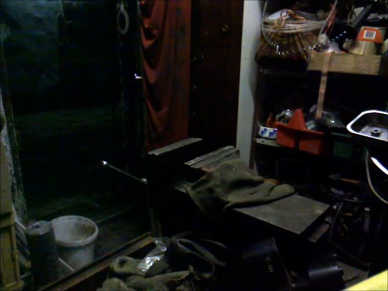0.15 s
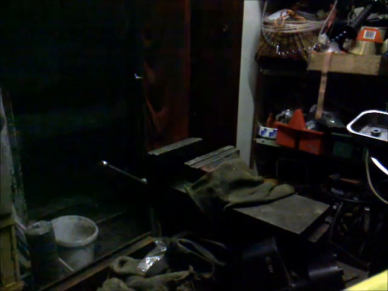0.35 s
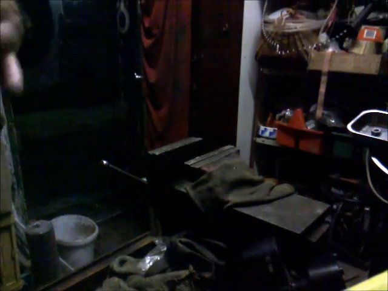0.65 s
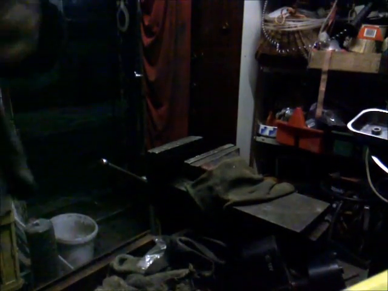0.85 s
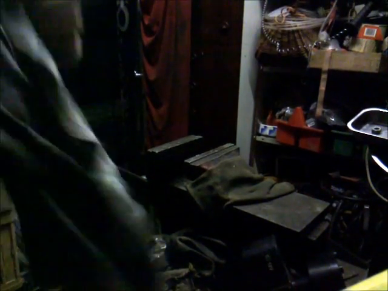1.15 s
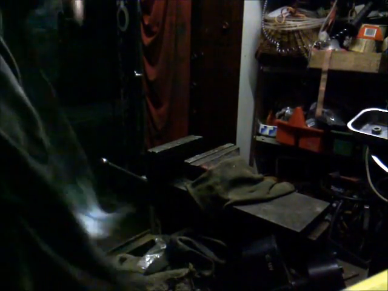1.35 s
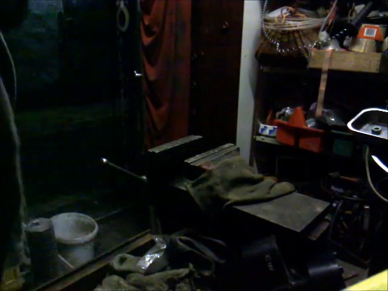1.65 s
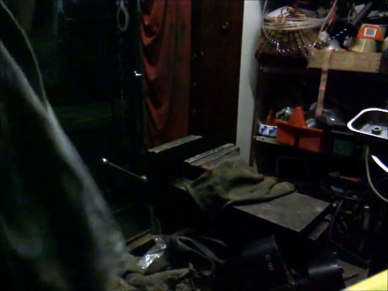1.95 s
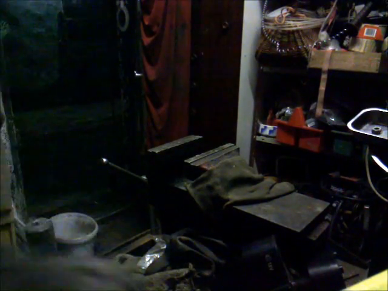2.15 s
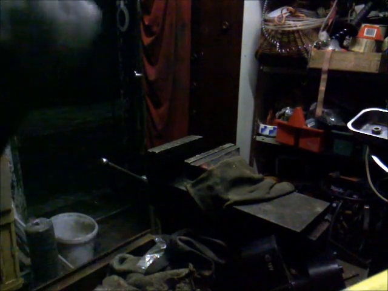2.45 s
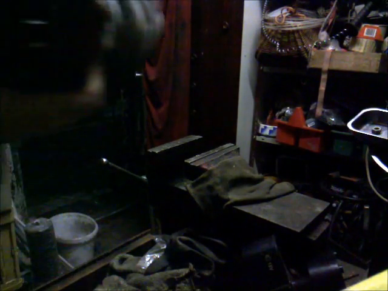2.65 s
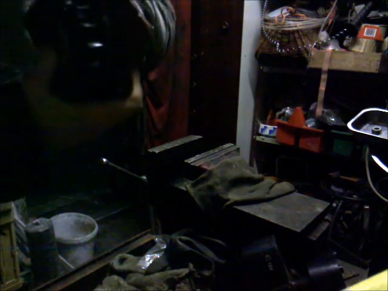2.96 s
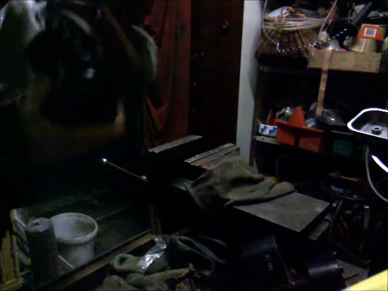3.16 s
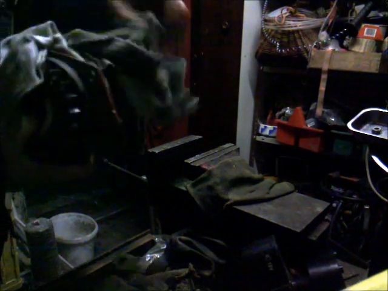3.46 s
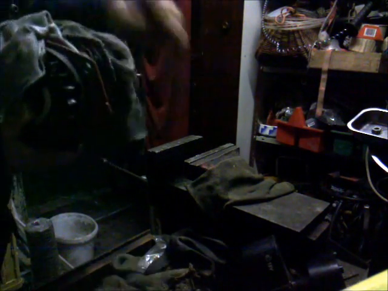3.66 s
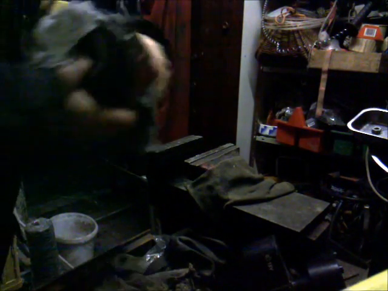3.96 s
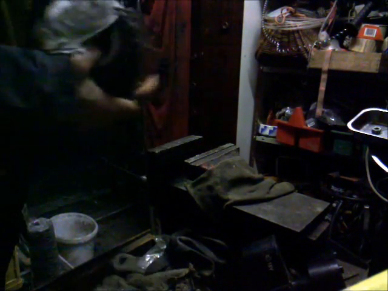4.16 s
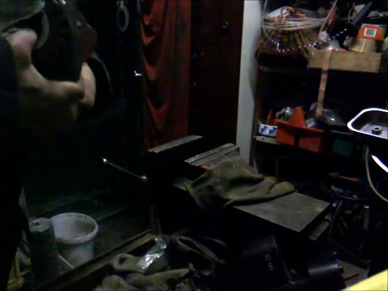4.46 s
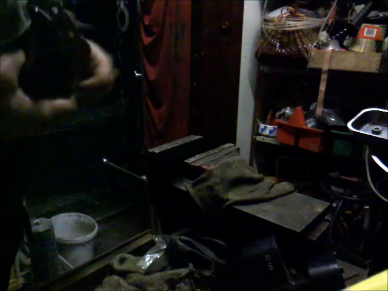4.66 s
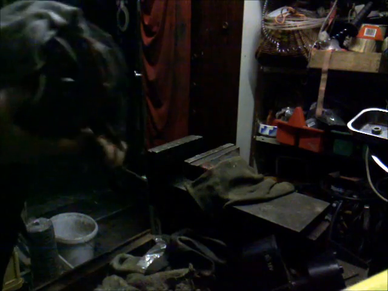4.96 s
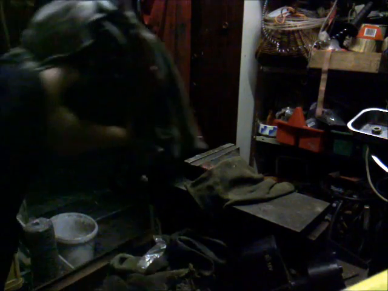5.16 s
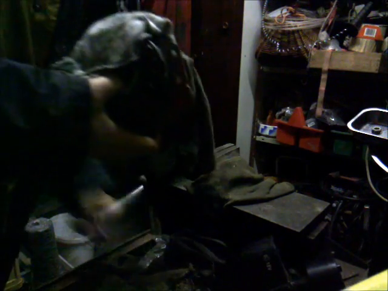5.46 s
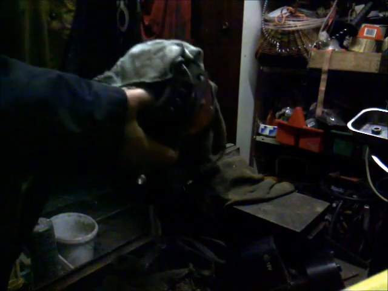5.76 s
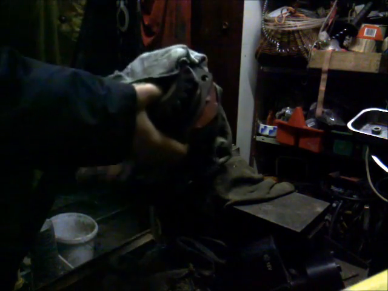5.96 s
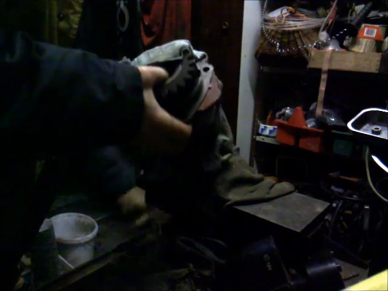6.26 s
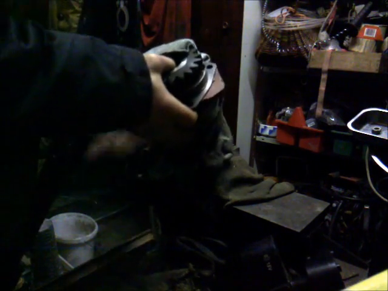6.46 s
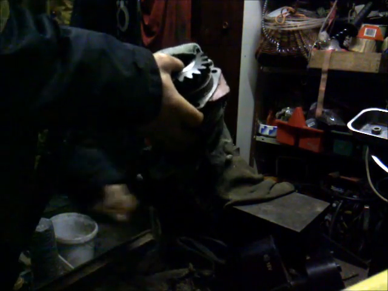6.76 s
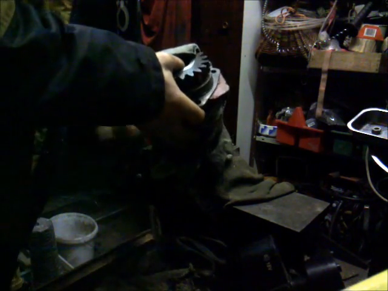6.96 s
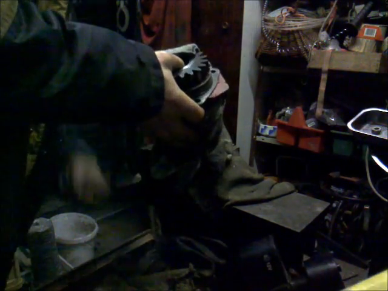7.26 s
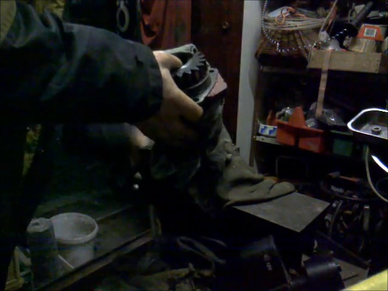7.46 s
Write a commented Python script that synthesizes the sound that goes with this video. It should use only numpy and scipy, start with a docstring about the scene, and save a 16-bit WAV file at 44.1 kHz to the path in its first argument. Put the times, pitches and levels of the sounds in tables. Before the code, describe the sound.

A hard clunk and short skid, then soft cloth rustling, then a rag wiped in rough strokes over a heavy metal gear with dull knocks.

```python
"""A rag is wiped hard over a heavy metal gear in strokes, with dull knocks, in a small workshop.
The wiping is uneven jolts and gritty noise through resonances; each knock rings damped modes under a crack.
Early on a part is knocked down and skids. Sleeves and rag rustle as clumpy noise, over quiet air and hiss.
The sound is widened into two channels with short opposed delays."""
import sys
import numpy as np
from scipy import signal
from scipy.fft import rfft, irfft, next_fast_len
from scipy.io import wavfile
from scipy.ndimage import uniform_filter1d, map_coordinates

SR = 44100
rng = np.random.default_rng(int(sys.argv[2]) if len(sys.argv) > 2 else 0)


def transcribe(u):
    """Save the signal u as a 16-bit wav file named by the first command-line argument.

    u: samples, shape (n,) or (channels, n), limited to [-1, 1]; the rate is SR.
    q: integer samples, one column per channel.
    """
    v = np.clip(np.atleast_2d(u).T, -1, 1)
    q = np.round(v * 32767).astype(np.int16)
    wavfile.write(sys.argv[1], SR, q)


N = 335601


def amp(db):
    """Turn a level in dB into a gain."""
    return 10 ** (np.asarray(db) / 20)


def unit(x):
    """Scale x to an average strength (rms) of 1."""
    return x / np.sqrt(np.mean(x ** 2) + 1e-20)


def along(points, hz):
    """Read a curve of (Hz, value) points at the given frequencies, on a log axis."""
    point_hz, value = np.transpose(points)
    return np.interp(np.log(hz + 1), np.log(point_hz + 1), value)


def curve(points):
    """Join (seconds, value) points into one value per sample."""
    point_s, value = np.transpose(points)
    return np.interp(np.arange(N) / SR, point_s, value)


def wobble(rate):
    """Draw a smooth random curve with the given number of random points per second."""
    knots = rng.standard_normal(int(N * rate / SR) + 4)
    return map_coordinates(knots, [np.arange(N) * rate / SR])


def filtered(x, response):
    """Multiply the spectrum of x by a response, which may also turn the phase."""
    size = next_fast_len(N + SR // 2)
    hz = np.fft.rfftfreq(size, 1 / SR)
    return irfft(rfft(x, size) * response(hz), size)[..., :N]


def coloured(x, points):
    """Shape the tone of x by a curve of (Hz, dB) points."""
    return filtered(x, lambda hz: amp(along(points, hz)))


def resonant(x, modes):
    """Pass x through side-by-side resonances, given as (Hz, width in Hz, dB)."""
    def response(hz):
        total = 0
        for k, (centre, width, db) in enumerate(modes):
            damping = 1j * hz * width
            sign = (-1) ** k  # neighbours have opposite signs
            total = total + sign * amp(db) * damping / (centre * centre - hz * hz + damping)
        return total
    return filtered(x, response)


def rubbed(level, drive, modes):
    """Rubbing: a drive of changing level excites resonances, at rms 1 for level 1."""
    return resonant(level * drive, modes) / np.std(resonant(drive, modes))


def swell(start, rise, hold, fade):
    """dB under full level of a movement that builds up, holds and fades (times in seconds)."""
    touch_db = -30  # level at both ends of the movement; it goes on falling outside them
    t = np.arange(N) / SR - start
    before = 1 - t / rise
    after = (t - rise - hold) / fade
    return touch_db * np.maximum(0, np.maximum(before, after))


def pair(unlike):
    """Two partly alike white noises, one for the middle and one for the sides."""
    a, b = rng.standard_normal((2, N))
    return np.array([a, (a + unlike * b) / np.hypot(1, unlike)])


def patchy(x, depth_db):
    """The grip on the part shifts, so patches of time and pitch get random gains."""
    spectrum = signal.stft(x, nperseg=256)[2]
    field = rng.standard_normal(spectrum.shape[1:])
    field = uniform_filter1d(field, size=3, axis=0)  # smooth over pitch
    field = uniform_filter1d(field, size=6, axis=1)  # smooth over time
    gain = amp(depth_db * unit(field))
    return signal.istft(spectrum * unit(gain), nperseg=256)[1][:, :N]


def air():
    """The quiet shop and a hiss: steady noise with a fixed tone."""
    # The tone of the background. Each row: frequency in Hz, relative level in dB.
    air_tone = [(30, -26), (76, -12), (130, 5.5), (200, -3.5), (330, -2), (1000, -15.5), (2700, -7.5),
                (4750, -49), (6640, -14.5), (10600, -11.5), (14000, -10)]
    return amp(-60.5) * unit(coloured(pair(0.36), air_tone))


def room(x):
    """The cluttered shop's echo: each frequency dies at its own speed, with a different tail for each."""
    # How long the echo lasts. Each row: frequency in Hz, time to fall by 60 dB in seconds.
    echo_time = [(200, 0.2), (2000, 0.026), (10000, 0.04)]
    noise = pair(0.95)[:, :SR // 2]  # one tail for the middle, one for the sides
    hz, t, spectrum = signal.stft(noise, SR, nperseg=256)
    fade = amp(-60 * t / along(echo_time, hz)[:, None])
    tail = signal.istft(spectrum * fade, SR, nperseg=256)[1]
    tail = tail / np.linalg.norm(tail[0])
    late = np.pad(x, ((0, 0), (200, 0)))  # the echo starts 200 samples late
    return signal.fftconvolve(late, tail, axes=1)[:, :N]


def rustle():
    """Fibres slide over fibres in small clumps, thick cloth shuffles and a hollow sleeve sweeps past."""
    # Sleeves and rag moving. Each row: time in seconds, level of the fine rustle in dB.
    fine_level = [(0, -60), (.18, -52), (.3, -58.5), (.62, -59), (.7, -54), (.76, -56), (.9, -65),
                  (1.2, -64.5), (1.31, -59), (1.4, -66.5), (1.65, -60), (1.93, -62.5), (2.07, -54.5),
                  (2.21, -58), (2.45, -48), (2.78, -54), (2.88, -61.5), (3.43, -47), (3.56, -50),
                  (3.67, -46.5), (3.85, -50), (3.96, -43), (4.06, -54), (4.23, -48), (4.51, -59.5),
                  (4.59, -49.5), (4.73, -60.5), (4.87, -53.5), (4.96, -58), (5.16, -47.5), (5.36, -60.5),
                  (5.6, -49.5), (5.76, -63), (6.2, -60), (6.5, -53), (6.9, -57), (7.1, -57.5), (7.6, -61)]
    # Thick cloth shifting. Each row: time in seconds, level of the low shuffle in dB.
    low_level = [(0, -56), (.3, -61), (.9, -63), (1.2, -75.5), (1.62, -62.5), (1.76, -68), (2.07, -61.5),
                 (2.9, -60.5), (3.5, -63.5), (3.67, -56), (3.85, -60.5), (4.23, -61), (4.5, -62.5),
                 (4.87, -60), (5.05, -59), (5.55, -56), (5.78, -57.5), (6.2, -60.5), (6.46, -53),
                 (6.8, -63), (7.1, -61), (7.6, -55.5)]
    # The tone of the fine rustle. Each row: frequency in Hz, relative level in dB.
    fine_tone = [(300, -37), (700, -6.5), (1500, -6.5), (2500, -10), (4500, -2.5), (6500, -11.5),
                 (9000, -2.5), (12300, 0.5), (14000, -6.5)]
    # The tone of the thick cloth. Each row: frequency in Hz, relative level in dB.
    low_tone = [(60, -13.5), (130, 4.5), (260, 3), (700, -3.5), (1300, -10.5), (2500, -19.5)]
    # Resonances of the hollow sleeve. Each row: frequency in Hz, width in Hz, relative level in dB.
    sleeve_modes = [(560, 930, -2.5), (1020, 160, 8.5), (1450, 690, -10.5)]

    clumps = amp(1.13 * wobble(25) + 0.52 * wobble(300))
    fine = unit(coloured(clumps * pair(0.63), fine_tone))
    lumps = amp(1.6 * wobble(30))
    low = unit(coloured(lumps * pair(0.31), low_tone))
    sweep_level = amp(-47 + swell(start=4.1, rise=.15, hold=.035, fade=.2))
    sweep = rubbed(sweep_level, amp(wobble(90)) * pair(0.76), sleeve_modes)
    return amp(curve(fine_level)) * fine + amp(curve(low_level)) * low + sweep


def knocks():
    """Each blow rings the damped gear most near the pitch of the struck spot, under a short crack."""
    # The blows. Each row: time in seconds, blow level in dB before the trims below,
    # crack over blow in dB, time for the ring to fall by 60 dB in seconds, pitch of the struck spot in Hz.
    blows = [(0.273, -46.5, -20.5, 0.047, 700), (0.33, -60, -21, 0.072, 746), (0.404, -5.5, -2, 0.04, 557),
             (0.415, -11, -12, 0.03, 600), (0.427, -21, -10, 0.025, 600), (0.67, -42, 13.5, 0.064, 414),
             (0.707, -39, 9.5, 0.015, 416), (0.85, -50, -21.5, 0.07, 250), (1.596, -46, -21, 0.096, 378),
             (1.883, -46.5, -18, 0.055, 401), (1.916, -49.5, -21, 0.081, 696),
             (2.025, -35, -31, 0.042, 740), (2.152, -44, -3.5, 0.0556, 374), (2.22, -51, -21.5, 0.05, 600),
             (2.792, -42, -23, 0.06, 920), (2.894, -41.5, -25, 0.053, 690), (2.98, -47, -26, 0.08, 270),
             (3.6, -44, -3.5, 0.073, 1330), (3.68, -49, -25, 0.04, 450), (3.713, -43, -25, 0.04, 700),
             (3.74, -45, -25, 0.04, 700), (3.782, -43.5, -25, 0.052, 616), (4.583, -40.5, -21, 0.067, 1230),
             (4.607, -37.5, -8, 0.095, 1230), (4.97, -45.5, -25, 0.05, 480), (5.044, -32, -5, 0.026, 541),
             (5.088, -37.5, -1, 0.041, 565), (5.169, -23, -21.5, 0.031, 859), (5.263, -37, -24, 0.044, 474),
             (5.397, -27.5, -31, 0.11, 487), (5.468, -18, 1, 0.1, 566), (5.658, -20, -37, 0.061, 482),
             (5.862, -19.5, -51.5, 0.067, 543), (5.891, -18.5, -14, 0.11, 470),
             (5.917, -23.5, -22, 0.25, 568), (5.955, -17, -20.5, 0.087, 1300),
             (6.02, -32.5, -13, 0.055, 536), (6.045, -27.5, -37, 0.15, 484), (6.084, -17, -32, 0.031, 596),
             (6.265, -39, -30, 0.039, 450), (6.29, -29, -30, 0.076, 500), (6.324, -20, -22, 0.05, 426),
             (6.447, -51, -9, 0.074, 250), (6.48, -23.5, -36.5, 0.05, 517), (6.511, -28, -24, 0.018, 576),
             (6.63, -41, -15, 0.033, 900), (6.724, -33, -30, 0.036, 450), (6.781, -28, -30, 0.028, 510),
             (6.9, -47, -37, 0.025, 684), (6.93, -22.5, -42, 0.062, 467), (6.947, -19.5, -29, 0.015, 620),
             (6.968, -26.5, -26, 0.035, 696), (7.194, -18.5, -15, 0.12, 595),
             (7.223, -15, -16.5, 0.14, 1300), (7.257, -23, -24.5, 0.094, 415), (7.307, -24, -20, 0.15, 576),
             (7.357, -14.5, -24.5, 0.046, 656), (7.367, -20.5, -38.5, 0.17, 615)]
    # Modes of the gear damped by the hand. Each row: frequency in Hz, relative level in dB,
    # ring time as a share of the knock's.
    gear_modes = [(99, 0.5, 1.36), (205, -7.5, 0.69), (267, 2.5, 0.93), (337, -6, 2.3), (463, 7, 0.46),
                  (567, 5, 0.74), (704, 1, 0.95), (801, -4, 0.96), (906, -1.5, 0.6), (1141, -1.5, 0.63),
                  (1297, -7, 1.3), (1543, -7.5, 1.7), (1940, -14, .7), (2390, -1, 0.8), (3000, -15, .6)]
    # Resonances of the first contact. Each row: frequency in Hz, width in Hz, relative level in dB.
    contact_modes = [(300, 510, 2), (900, 2060, -3.5), (2216, 550, -3.5)]
    # The tone of crack and skid. Each row: frequency in Hz, relative level in dB.
    crack_tone = [(1000, -17.5), (2500, -5), (4500, -0.5), (6500, -11), (9000, -4.5), (13000, -8.5)]

    ring, tick, crack = np.zeros((3, N + SR))
    t = np.arange(SR // 4) / SR
    rise = 1 - np.exp(-t / 0.001)  # a soft start of about a millisecond
    mode_hz, mode_db, share = np.transpose(gear_modes)[:, :, None]
    chance = rng.standard_normal((len(blows), 2, len(gear_modes), 1))
    for (start, db, crack_db, t60, spot_hz), (uneven, detune) in zip(blows, chance):
        first = round(start * SR)
        at = slice(first, first + len(t))
        # 4 dB weaker for each octave away from the struck spot's pitch
        strength_db = mode_db + 1.87 * uneven - 4 * np.abs(np.log2(mode_hz / spot_hz))
        phase = 2 * np.pi * mode_hz * (1 + .03 * detune) * t + 0.68 * detune
        modes = amp(strength_db - 60 * t / (t60 * share)) * np.sin(phase)
        ring[at] += amp(db - 7) * rise * modes.sum(axis=0)
        tick[at] += amp(db - 18.5 - 60 * t / 0.021)
        # a fast fade and a weaker slow one
        crack_fade = amp(-60 * t / (0.6 * t60)) + 0.37 * amp(-60 * t / (2.5 * t60))
        crack[at] += amp(db + crack_db - 7.5) * rise * crack_fade
    # the part skids after it lands
    skid = amp(-43 + swell(start=.41, rise=.02, hold=.105, fade=.06) + 1.6 * wobble(154.2))
    contact = rubbed(tick[:N], pair(0.78), contact_modes)
    crack_noise = unit(coloured(pair(0.29), crack_tone))
    return ring[:N] + contact + (crack[:N] + skid) * crack_noise


def strokes():
    """The rag catches and slips on the teeth: uneven jolts over friction noise."""
    # The wiping strokes. Each row: start in seconds, press in seconds, hold in seconds, lift in seconds,
    # pressure in dB, rasp over pressure in dB, tooth scrape over pressure in dB.
    wipes = [(4.924, 0.043, .2, .05, -55.5, -9, -14), (5.14, 0.029, 0.031, .03, -40.5, -27, -20),
             (5.388, 0.066, 0.046, 0.086, -24, -7, -15.5), (5.603, 0.054, 0.0036, 0.061, -31, -7.5, -21.5),
             (5.818, 0.044, 0.1, 0.081, -28, -9.5, -13.5), (6.03, 0.017, 0.045, 0.044, -28, -14, -24.5),
             (6.256, 0.058, .05, 0.082, -26.5, -9, -13.5), (6.439, 0.0093, .01, .03, -46.5, -23, -18),
             (6.469, 0.013, 0.0027, 0.04, -29.5, -29, -33),
             (6.496, 0.014, 0.0072, 0.05, -33.5, -18.5, -27.5), (6.703, 0.025, 0.059, 0.055, -39, -24, -24),
             (6.736, 0.048, 0.01, 0.06, -36, -16, -27), (6.875, 0.023, .01, 0.042, -42, -27, -29),
             (6.922, 0.011, .004, 0.038, -28, -35, -37), (6.956, 0.011, 0.0064, 0.049, -31, -23, -33),
             (7.164, 0.03, 0.14, 0.11, -25, -7.5, -17), (7.278, 0.041, 0.078, 0.057, -25, -10.5, -21.5)]
    # Low resonances of the gear under the rag. Each row: frequency in Hz, width in Hz, relative level in dB.
    body_modes = [(152.4, 93, -2), (235, 118, 1), (390, 157, -1), (553, 142, -3.5), (860, 170, -13.5),
                  (1276, 89, -10), (2460, 240, -31.5)]
    # Resonances of the rasp. Each row: frequency in Hz, width in Hz, relative level in dB.
    rasp_modes = [(1820, 1400, -2), (2500, 770, 2.5), (3060, 510, -3)]
    # Resonances of the teeth under the rag. Each row: frequency in Hz, width in Hz, relative level in dB.
    teeth_modes = [(3760, 270, -1.5), (4440, 790, 0.5), (5300, 1400, -3.5), (6750, 2000, -11),
                   (10000, 460, -5.5), (11500, 7400, -22.5)]
    rasp_grows, scrape_grows = 1.26, 1.04  # dB of treble for each dB of pressure
    scrape_lag = 0.44  # share of the hold that passes before the rag reaches the teeth in full

    pressure, rasp, scrape = np.zeros((3, N))
    for start, press, hold, lift, db, rasp_db, scrape_db in wipes:
        under_db = swell(start, press, hold, lift)
        late_db = swell(start, press + scrape_lag * hold, (1 - scrape_lag) * hold, lift)
        # where strokes overlap, the stronger one counts
        pressure = np.maximum(pressure, amp(db + under_db))
        rasp = np.maximum(rasp, amp(db + rasp_db + rasp_grows * under_db))
        scrape = np.maximum(scrape, amp(db + scrape_db + scrape_grows * late_db))

    catch = amp(0.95 * wobble(70) + 0.67 * wobble(260))  # grip comes and goes
    slip_here = rng.random(N) < 420 / SR  # about 420 slips a second
    slips = unit(slip_here * rng.standard_normal(N) * amp(0.9 * rng.exponential(size=N)))
    # each slip frees a puff of grit
    bursts = np.abs(filtered(np.abs(slips), lambda hz: 1 / (1 + 1j * hz / 120)))
    jolts = catch * (slips + .6 * pair(.7))
    grit = (1.1 + unit(bursts) * 0.22) * amp(2.8 * wobble(60))

    wipe = rubbed(pressure, jolts, body_modes)
    wipe = wipe + rubbed(rasp, grit * pair(0.4) + 0.56 * slips, rasp_modes)
    wipe = wipe + rubbed(scrape, grit * pair(0.77), teeth_modes)
    return patchy(wipe, depth_db=3)


def scene():
    """Hands at work close by: wiping and knocks with their echo, rustle and air."""
    work = strokes() + knocks()
    echo = amp(-15) * room(work)
    return work + echo + rustle() + air()


def spread(hz):
    """Phase of right over left: inverted and 16 samples early, but 12 late in the presence band."""
    turn = 2j * np.pi * hz / SR
    presence = 1 / (1 + (3100 / (hz + 1)) ** 8) / (1 + (hz / 6300) ** 16)  # about 3100 to 6300 Hz
    early = (1 - presence) * np.exp(16 * turn)
    late = presence * np.exp(-12 * turn)
    phase = np.unwrap(np.angle(-early - late + 1e-9j))
    return phase + 0.54 * hz / (hz + 350) * np.exp(-(hz / 900) ** 2)  # the bass turns sooner


def record(dry):
    """The sound is widened into two channels, with deep bass thinned and the top cut."""
    middle, sides = dry
    unlike_part = sides - middle
    top_hz = 13900

    def band(hz):
        return 1j * hz / (45 + 1j * hz) * (hz < top_hz)

    def to_sum(hz):
        return band(hz) * np.cos(spread(hz) / 2)

    def to_difference(hz):
        return band(hz) * np.sin(spread(hz) / 2)

    # the differing part of the noise fills the notches
    mid = filtered(middle, to_sum)
    mid = mid + filtered(unlike_part, lambda hz: 1.23 * hz / (hz + 120) * to_difference(hz))
    side = filtered(sides, lambda hz: -1j * to_difference(hz))
    side = side + filtered(unlike_part, lambda hz: 1.1j * np.exp(-((hz - 6200) / 1500) ** 2) * to_sum(hz))
    return np.array([mid + side, mid - side]) * amp([[-.3], [.3]])  # left a little softer


dry = scene()
out = record(dry)
transcribe(out)
```